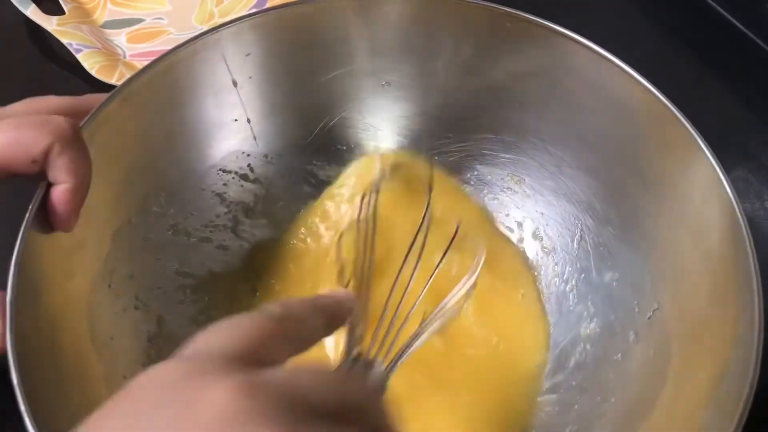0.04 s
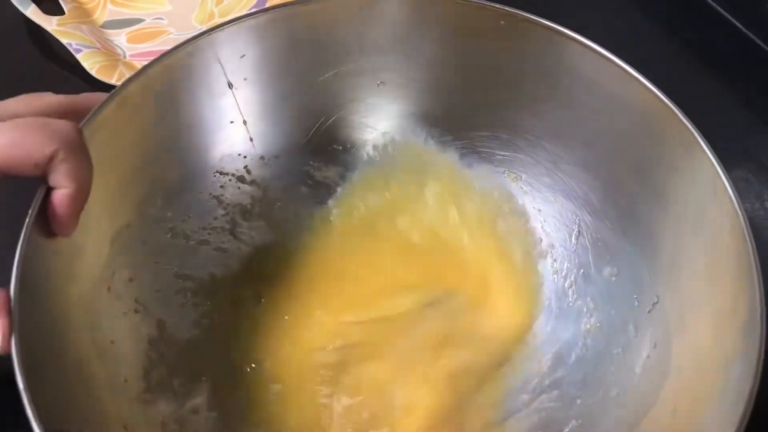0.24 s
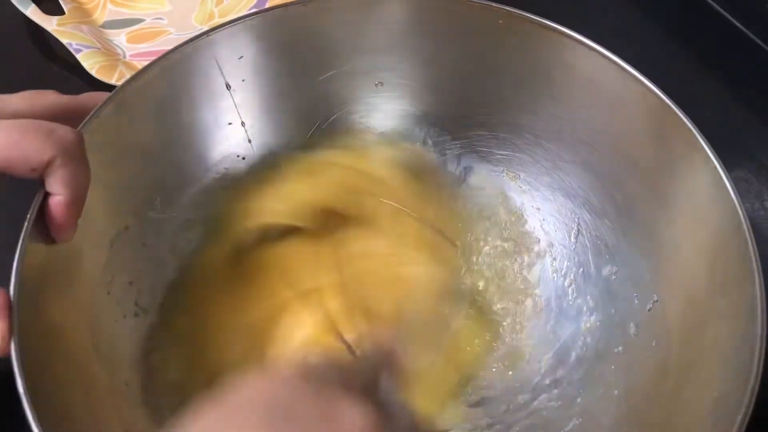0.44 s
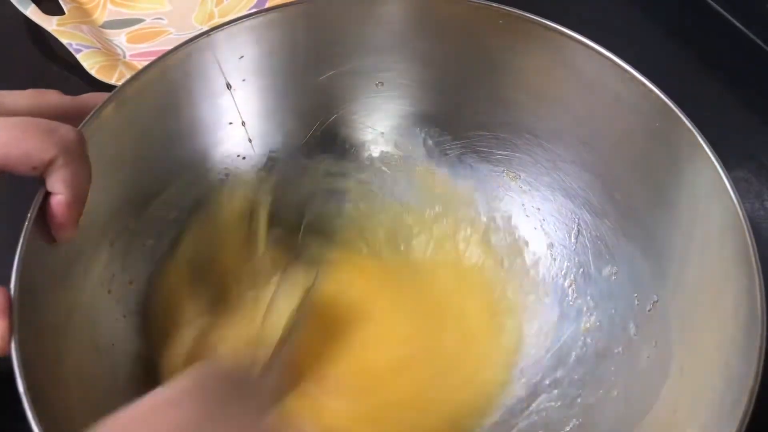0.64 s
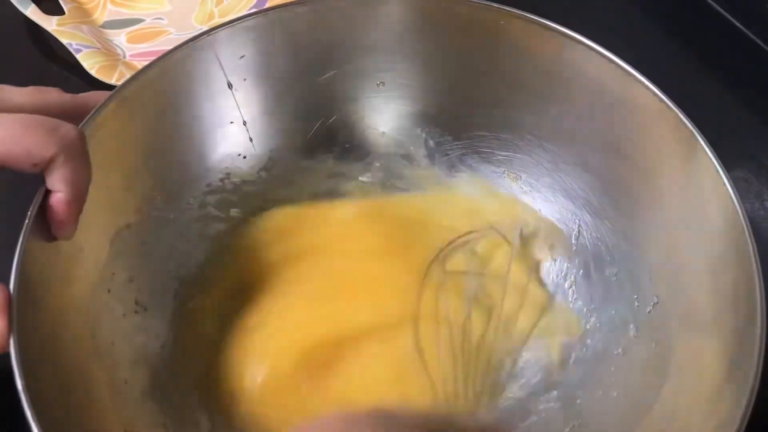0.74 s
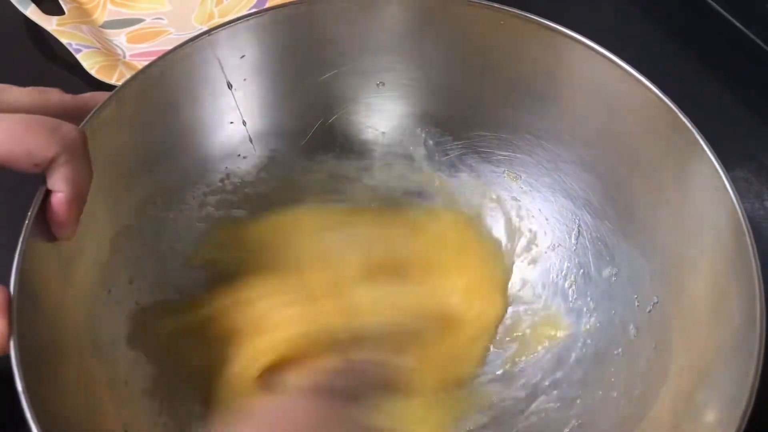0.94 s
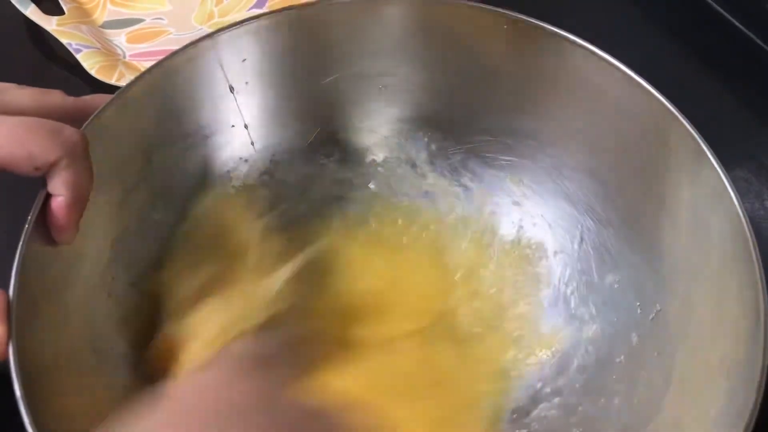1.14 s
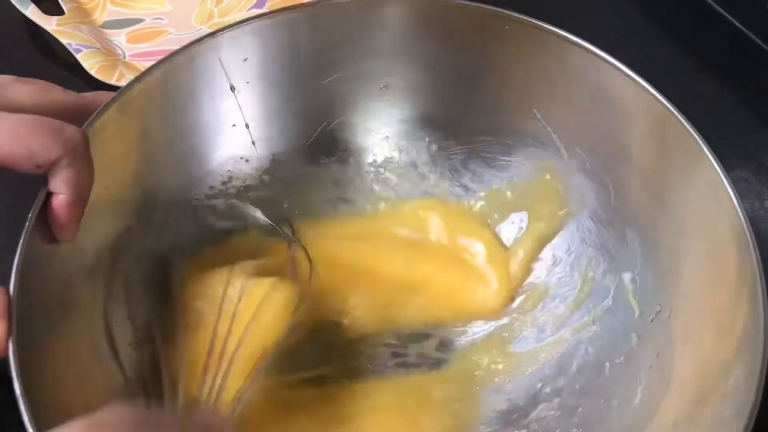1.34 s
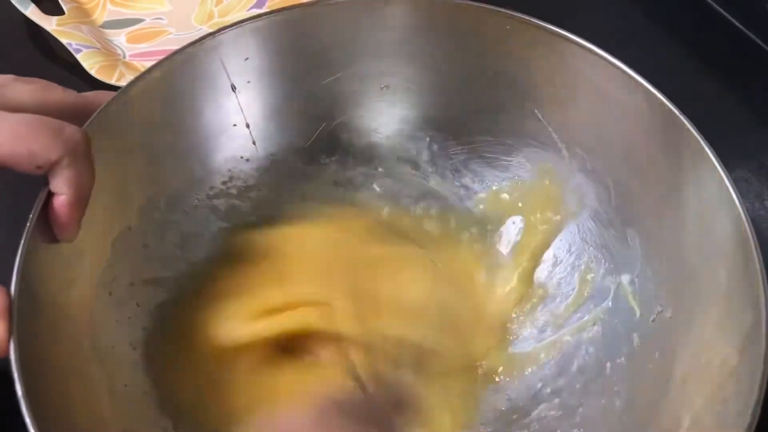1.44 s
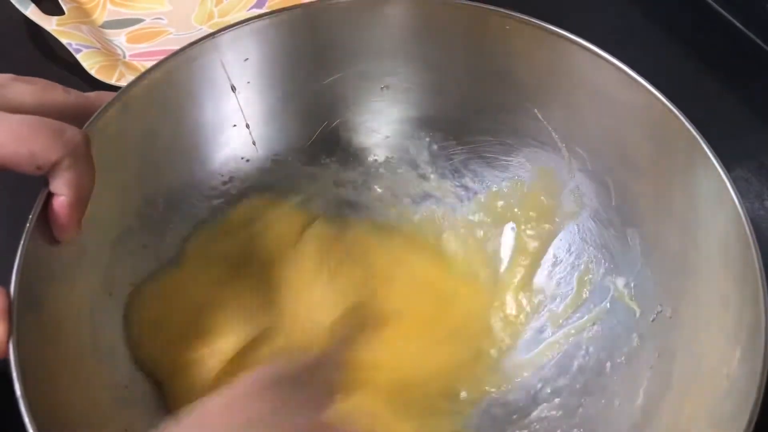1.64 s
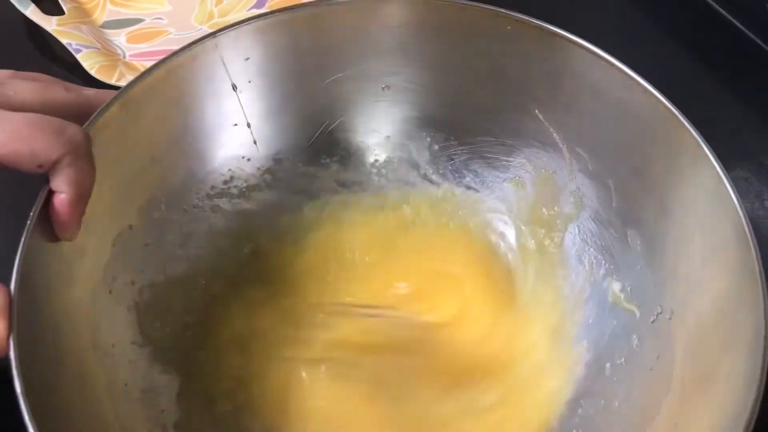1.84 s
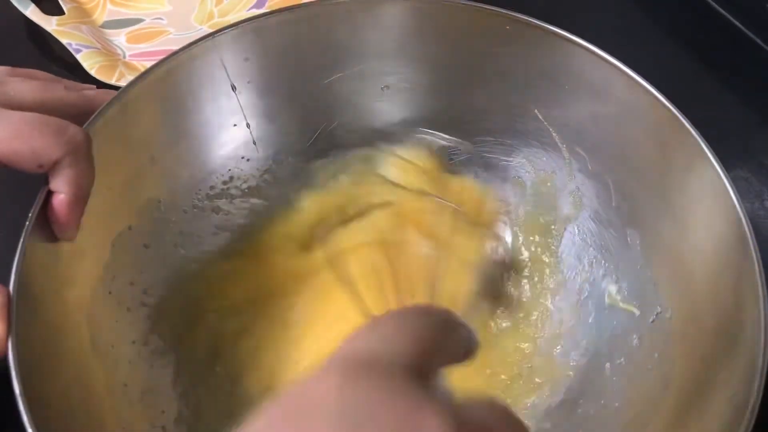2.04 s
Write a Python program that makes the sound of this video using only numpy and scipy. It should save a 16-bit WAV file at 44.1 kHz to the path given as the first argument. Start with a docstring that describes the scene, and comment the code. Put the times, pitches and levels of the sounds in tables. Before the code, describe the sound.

A wire whisk rapidly beats thick egg mixture in a steel bowl, close up. Light rattles and wet swishing fill the first 0.3 seconds; from 0.4 strokes strike harder, with sharp bright clacks and pings near 0.64 and 1.13. Scrapes, short dull bowl rings, slaps, fizzing ticks and small rising gulps mingle. Contacts lighten after 1.4, fading by 2. Faint low hum, short kitchen reflections.

```python
"""In a kitchen, close up, a wire whisk beats a thick egg mixture in a steel bowl, about four strokes a second.
Noise bursts and fading tones make the wires clack and chatter and the hand-damped bowl ring briefly.
More noise slaps and swishes with fizzing ticks; gulps are short tones that rise in pitch.
Faint sine tones and soft noise form an appliance hum and room tone, and the walls add a short tail.
"""
import sys
import numpy as np
from scipy import signal
from scipy.fft import rfft, irfft, next_fast_len
from scipy.io import wavfile
from scipy.ndimage import map_coordinates

SR = 44100
rng = np.random.default_rng(int(sys.argv[2]) if len(sys.argv) > 2 else 0)


def generate_wav(signal):
    """Clip the signal to [-1, 1] and save it as 16-bit WAV at the path in sys.argv[1]."""
    frames = np.transpose(np.atleast_2d(signal))
    scaled = np.clip(frames, -1, 1) * 32767
    pcm = np.round(scaled).astype(np.int16)
    wavfile.write(sys.argv[1], SR, pcm)


N = 92610  # length of the scene in samples
RING_S = 0.4  # time allowed for each contact, ping or gulp to die away
ATTACK_S = 0.00039  # rise constant of a full-strength (0 dB) blow, and of the ticks


def amp(db):
    """Turn decibels into gain."""
    return 10 ** (np.asarray(db) / 20)


def unit(x):
    """Scale a sound to an rms level of 1."""
    return x / np.sqrt(np.mean(x ** 2) + 1e-20)


def along(points, hz):
    """Read between (frequency, value) points, spacing the frequencies as the ear does, on a log scale."""
    f, v = np.transpose(points)
    return np.interp(np.log(hz + 1), np.log(f + 1), v)


def noise(colour, size):
    """Coloured noise of rms 1: random sound with each frequency turned up or down by the colour table."""
    hz = np.fft.rfftfreq(size, 1 / SR)
    low_cut = np.minimum(hz / colour[0][0], 1)  # falls away below the lowest point
    gain = amp(along(colour, hz)) * low_cut
    return unit(irfft(rfft(rng.standard_normal(size)) * gain, size))


def wobble(rate, size):
    """A smooth random curve through a number of random points (rate) each second."""
    points = rng.standard_normal(size // 8)
    return map_coordinates(points, [np.arange(size) * rate / SR], mode="wrap")


def fade(t, attack, t60):
    """A quick rise, then a fade that loses 60 dB in t60 seconds."""
    return (1 - np.exp(-t / attack)) * amp(-60 * t / t60)


def add(track, s, x):
    """Mix a sound into the track, starting at time s."""
    i = max(round(s * SR), 0)
    track[i:i + len(x)] += x[:max(N - i, 0)]


# Steady appliance tones: (frequency [Hz], level [dB])
HUM = [(83, -55), (186, -59.5)]
# Colour of the quiet room: (frequency [Hz], level [dB])
ROOM_TONE = [(25, -27), (50, -1.5), (180, -3.5), (300, -15.5), (1000, -22.5), (16000, -45)]
ROOM_TONE_DB = -54


def background():
    """An appliance hums in sine tones of slightly unsteady phase, over a soft noise of room tone."""
    t = np.arange(N) / SR
    hum = np.zeros(N)
    for hz, db in HUM:
        phase = 2 * np.pi * hz * t + 0.12 * wobble(7.75, N)
        hum += amp(db) * np.sqrt(2) * np.sin(phase)
    return hum + amp(ROOM_TONE_DB) * noise(ROOM_TONE, N)


# Colour of the wet swish and its ticks: (frequency [Hz], level [dB])
SWISH = [(120, -25.5), (520, 9.5), (780, -7), (1100, 4.5), (1600, -3), (4000, 1.5), (5800, 5), (7500, -1.5),
         (15500, -17.5)]
TICK_SCATTER_DB, TICK_T60 = 4, 0.013  # spread of tick sizes in dB, fading time in s


def ticks(count):
    """Wire ticks and bursting bubbles: tiny spurts of noise at random times, each with its own size."""
    strength, t = np.zeros(N), np.arange(SR // 20) / SR
    times = rng.random(count) * N / SR
    sizes = np.clip(rng.standard_normal(count), -2, 2)
    for s, size in zip(times, sizes):
        tick = amp(TICK_SCATTER_DB * size) * fade(t, ATTACK_S, TICK_T60)
        add(strength, s, tick ** 2)  # overlapping ticks add their energies
    return unit(np.sqrt(strength) * noise(SWISH, N))


SWISH_DB, TICK_DB = -10.5, -10  # on top of the moving level below
# Strength of the wires dragging through the mixture: (time [s], level [dB])
DRAG = [(0, -37.5), (0.209, -35.5), (0.276, -30), (.34, -40.5), (0.619, -40), (.76, -31.5), (.87, -40.5),
        (1.21, -39), (1.33, -37), (1.52, -32.5), (1.59, -37), (1.70, -27.5), (1.88, -30.5), (1.96, -50.5),
        (2.1, -54.5)]


def drag():
    """Wires sliding through the mixture: a wet swish of noise made grainy by fast wobbles, plus ticks."""
    level_db = np.interp(np.arange(N) / SR, *np.transpose(DRAG))
    grain = amp(0.32 * wobble(140, N) + 1.5 * wobble(900, N))
    swish = unit(grain * noise(SWISH, N))
    return amp(level_db) * (amp(SWISH_DB) * swish + amp(TICK_DB) * ticks(count=750))


SPOT_DB, SPOT_WIDTH_HZ = 4.5, 326  # depth and spacing of the ripple in the colour of each struck spot


def burst(t, colour, attack, t60, chatter_db):
    """A blow as a dense, chattering burst of noise, with resonances of its own at each spot struck."""
    shape = fade(t, attack, t60)
    spectrum = rfft(noise(colour, len(t)))
    spectrum *= amp(SPOT_DB * wobble(SR / (SPOT_WIDTH_HZ * RING_S), len(spectrum)))
    chatter = amp(chatter_db * wobble(706, len(t)))
    x = irfft(spectrum, len(t)) * chatter * shape
    return x * np.linalg.norm(shape) / np.linalg.norm(x)  # the fade alone sets the energy


LOADING = 0.0264  # the shifting mixture detunes the tones by about this share


def ring(t, modes, scatter_db):
    """Metal ringing in its own tones (modes); a new spot gives new strengths and slightly new pitches."""
    hz, db, t60 = np.transpose(modes)[:, :, None]
    gain = amp(db + scatter_db * rng.standard_normal(hz.shape))
    pitch = hz * (1 + LOADING * rng.standard_normal(hz.shape))
    phase = 2 * np.pi * (pitch * t + rng.random(hz.shape))
    tones = gain * np.sin(phase) * fade(t, 0.0016, t60)
    return np.sum(tones, 0) / np.linalg.norm(gain)


CLACK_DB, WIRE_RING_DB = -7, -18  # on top of the clack level of each contact
KNOCK_DB, BOWL_RING_DB = 2, -5  # on top of the bowl level
SCRAPE_DB = 1.5  # on top of the scrape level
SLAP_DB, SLAP_GROWS = -20, 0.74  # slap for a 0 dB clack; growth in dB per dB of clack
CUSHION = 0.0164  # lighter contacts sink in and rise more slowly: growth of the attack per dB
CLACK_T60, CHOKE = 0.073, 0.0065  # s for a 0 dB clack; lighter ones die sooner: growth per dB
# Tones of the whisk's loops, then of the bowl: (frequency [Hz], relative level [dB], time to fall 60 dB [s])
WIRE_MODES = [(3355, 18.5, 0.079), (4930, 6, 0.15), (5850, 26, 0.06), (6060, 18, 0.12)]
BOWL_MODES = [(523.6, 0.5, 0.15), (599.5, -10, 0.082), (1070.6, 1, 0.12), (1618, -16.5, 0.23),
              (2180, 6, 0.082), (2844, -16.5, 0.11)]
# Colours of wire clack, bowl knock, steel scrape and wet slap: (frequency [Hz], level [dB])
CLACK = [(1500, -77.5), (2800, -10), (4200, -7), (5200, 0), (6400, -1), (7300, -13.5), (11000, -36)]
KNOCK = [(400, -19.5), (900, -2.5), (2300, 3.5), (3200, 1.5), (5000, -13.5)]
SCRAPE = [(3000, -55), (7000, 0.5), (10000, -2), (13000, -9), (16000, -23)]
SLAP = [(70, -30), (190, -1.5), (370, -8.5), (590, 2.5), (780, -17.5), (1500, -24)]
# Wires meeting the bowl: (time [s], clack level [dB], bowl level [dB], scrape level [dB])
CONTACTS = [(0.0074, -25, -34, -43.5), (0.0424, -31, -62, -46), (0.0907, -20.5, -36, -43),
            (0.0982, -21, -35, -35), (0.1095, -22, -51, -55), (0.1478, -24.5, -35, -35.5),
            (0.1735, -24.5, -34.5, -34), (0.1978, -18.5, -33, -33), (0.2183, -19.5, -33, -32.5),
            (0.2604, -29, -39, -32.5), (0.393, -15.5, -30.5, -32.5), (0.407, -14, -29.5, -33),
            (0.4782, -8, -21.5, -42), (0.491, -7.5, -27.5, -25.5), (0.6414, -3, -24.5, -22.5),
            (0.6512, -5.5, -21, -27.5), (0.6912, -15, -24.5, -33), (0.7425, -8.5, -25, -25.5),
            (0.7584, -17.5, -42, -28), (0.8949, -12.5, -27, -29.5), (0.9091, -13, -27, -38),
            (0.9356, -18.5, -27.5, -31), (0.9892, -10.5, -33, -26.5), (0.9993, -22, -26, -30),
            (1.1302, -5, -34.5, -19), (1.1387, -5, -30.5, -20.5), (1.154, -9.5, -23, -42),
            (1.1744, -10, -23, -19), (1.1834, -11.5, -18, -29), (1.2168, -15, -34, -30.5),
            (1.3893, -15, -29.5, -31.5), (1.4109, -21.5, -29.5, -39.5), (1.4804, -15, -34.5, -29.5),
            (1.4946, -15, -31.5, -36), (1.5842, -29, -38, -54), (1.6108, -18, -24.5, -30),
            (1.6349, -18.5, -28, -34), (1.6563, -31, -44, -44), (1.7062, -14, -43, -32),
            (1.7296, -21.5, -60, -37), (1.745, -10, -34, -39), (1.7768, -14.5, -25.5, -35),
            (1.8287, -18.5, -52, -33.5), (1.8638, -22, -30, -32), (1.9257, -24, -40, -46)]


def contacts():
    """Each contact clacks and rings the wires, knocks the bowl, scrapes the steel and slaps the mixture."""
    out, t = np.zeros(N), np.arange(round(RING_S * SR)) / SR
    for s, wire_db, bowl_db, scrape_db in CONTACTS:
        rise = ATTACK_S * np.exp(-CUSHION * wire_db)
        life = CLACK_T60 * np.exp(CHOKE * wire_db)
        wires = amp(CLACK_DB) * burst(t, CLACK, rise, life, chatter_db=2.0)
        wires += amp(WIRE_RING_DB) * ring(t, WIRE_MODES, scatter_db=1.0)
        bowl = amp(KNOCK_DB) * burst(t, KNOCK, rise, t60=0.041, chatter_db=1.5)
        bowl += amp(BOWL_RING_DB) * ring(t, BOWL_MODES, scatter_db=7)
        scrape = amp(SCRAPE_DB) * burst(t, SCRAPE, 2 * rise, t60=0.084, chatter_db=4.0)
        slap = burst(t, SLAP, attack=0.0024, t60=0.067, chatter_db=2.0)
        slap *= amp(SLAP_DB + SLAP_GROWS * wire_db)
        add(out, s, amp(wire_db) * wires + amp(bowl_db) * bowl + amp(scrape_db) * scrape + slap)
    return out


PING_ATTACK_S, PING_SPREAD = 0.00036, 0.065  # rise constant; spread of pitches as a share of the centre
PING_CYCLES, LINGER_CYCLES = 66.6, 158  # cycles to fall by 60 dB: the cluster, the centre tone
LINGER_DB = -6.5  # centre tone against the listed level
CLANG_GROWS = 0.16  # harder pings stir more of the neighbouring tones: extra dB per dB


def ping(t, hz, db, count):
    """A cluster of close tones, soon choked by the mixture; its centre lingers and leads in a gentle ping."""
    offsets = np.linspace(-1, 1, count) + rng.standard_normal(count) / count
    pitch = hz * (1 + PING_SPREAD * offsets)[:, None]
    shape = fade(t, PING_ATTACK_S, PING_CYCLES / hz)
    cluster = np.sin(2 * np.pi * (pitch * t + rng.random((count, 1)))).sum(0) * shape
    clang = amp(CLANG_GROWS * db) * cluster * np.linalg.norm(shape) / np.linalg.norm(cluster)
    centre = np.sin(2 * np.pi * hz * t) * fade(t, PING_ATTACK_S, LINGER_CYCLES / hz)
    return amp(db) * (clang + amp(LINGER_DB) * centre)


# Hard blows that make one wire or part of the bowl sing: (time [s], pitch [Hz], relative level [dB])
PINGS = [(0.043, 1030, -32), (0.277, 1077, -34), (0.478, 5340, -9), (0.476, 1069, -20.5),
         (0.478, 1688, -21), (0.6407, 4850, 0.5), (0.91, 5820, -12), (0.989, 4300, -14.5),
         (1.131, 6340, -2.5), (1.131, 4230, -11), (1.389, 1880, -21), (1.391, 1326, -23.5),
         (1.584, 5530, -17), (1.635, 3210, -19.5), (1.744, 1091, -19.5), (1.743, 1679, -24),
         (1.744, 2323, -16), (1.743, 2920, -15.5), (1.745, 5970, -12)]


def pings():
    """Hard blows set one wire or one part of the bowl singing at its own pitch."""
    out, t = np.zeros(N), np.arange(round(RING_S * SR)) / SR
    for s, hz, db in PINGS:
        add(out, s, ping(t, hz, db, count=9))
    return out


GULP_T60, GULP_ATTACK_S = 0.069, 0.0066
GULP_RISE_PER_S = 2.3  # pitch rise per second, as a share of the starting pitch
GULP_WAVER = 0.05  # rough share by which the pitch wanders as the pocket is squeezed
# Air pockets closing in the mixture: (time [s], starting pitch [Hz], relative level [dB])
GULPS = [(0.41, 240, -31), (0.498, 199, -30.5), (.745, 555, -25), (0.896, 279, -34.5), (0.953, 166.7, -22),
         (.942, 440, -26), (0.992, 497, -26.5), (1.13, 351, -27.5), (1.497, 199, -30), (1.778, 530, -25.5),
         (1.832, 423, -32)]


def gulps():
    """Air pockets ring with a rising, wandering pitch as the mixture folds over them."""
    out, t = np.zeros(N), np.arange(round(RING_S * SR)) / SR
    for s, hz, db in GULPS:
        waver = GULP_WAVER * wobble(1 / GULP_ATTACK_S, len(t))
        pitch = hz * (1 + GULP_RISE_PER_S * t + waver)
        tone = np.sin(2 * np.pi * np.cumsum(pitch) / SR)
        add(out, s, 2 * amp(db) * tone * fade(t, GULP_ATTACK_S, GULP_T60))
    return out


ROOM_DB = -9  # level of the tail against the direct sound
# How long the room holds each pitch: (frequency [Hz], time to fall 60 dB [s])
ROOM_T60 = [(150, 0.34), (1000, 0.28), (14000, 0.3)]


def kitchen(x, count=8):
    """Hard walls add a short tail of fading noise, new for each stretch of time as the whisk moves."""
    out = np.zeros(N)
    for part in np.array_split(np.arange(N), count):
        hz, t, z = signal.stft(rng.standard_normal(SR // 2), SR, nperseg=256)
        z *= fade(t, 0.011, along(ROOM_T60, hz)[:, None])  # each frequency dies at its own speed
        tail = signal.istft(z, SR, nperseg=256)[1]
        add(out, part[0] / SR, signal.fftconvolve(x[part], tail / np.linalg.norm(tail)))
    return out


def scene():
    """The whisking, its tail from the walls and the quiet background."""
    near = drag() + contacts() + pings() + gulps()
    return (near + amp(ROOM_DB) * kitchen(near) + background())[None]


TOP_HZ = 15900  # nothing is kept from here up


def record(dry):
    """The recorder rounds off the highest peaks and keeps nothing above its band limit."""
    rounded = dry / (1 + np.abs(dry / 0.85) ** 4) ** (1 / 4)
    size = next_fast_len(N + SR // 2)
    keep = np.fft.rfftfreq(size, 1 / SR) < TOP_HZ
    return irfft(rfft(rounded, size) * keep, size)[:, :N]


dry = scene()
out = record(dry)
generate_wav(out)
```